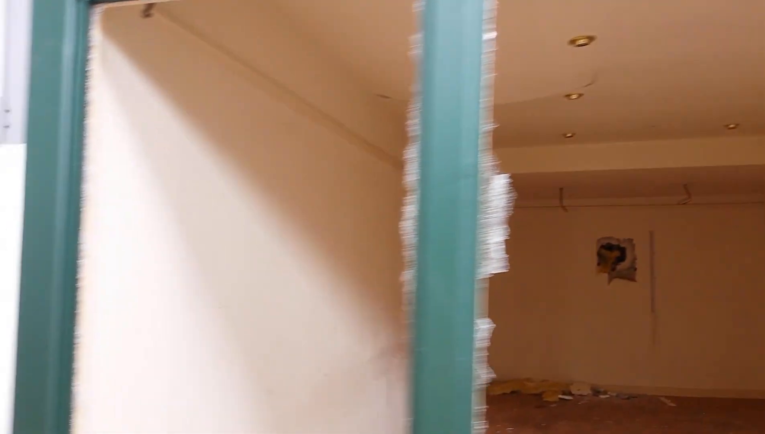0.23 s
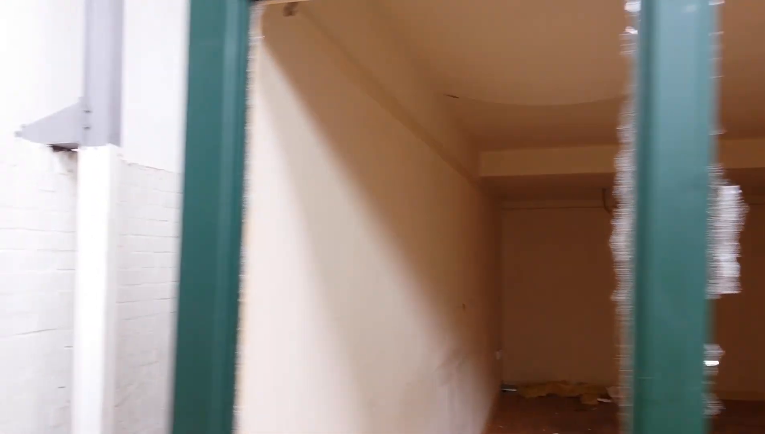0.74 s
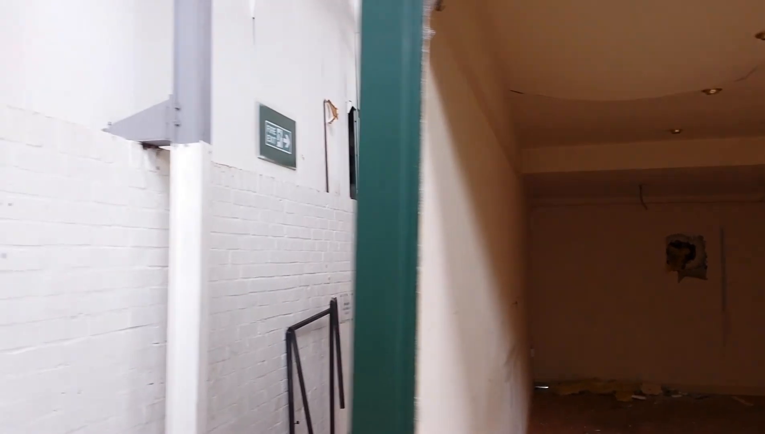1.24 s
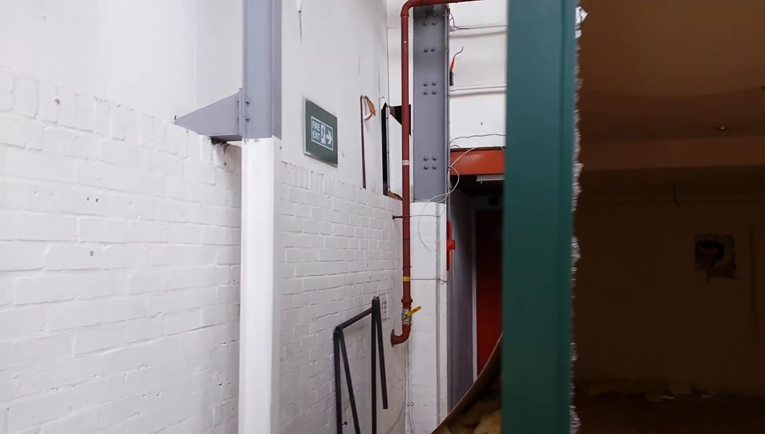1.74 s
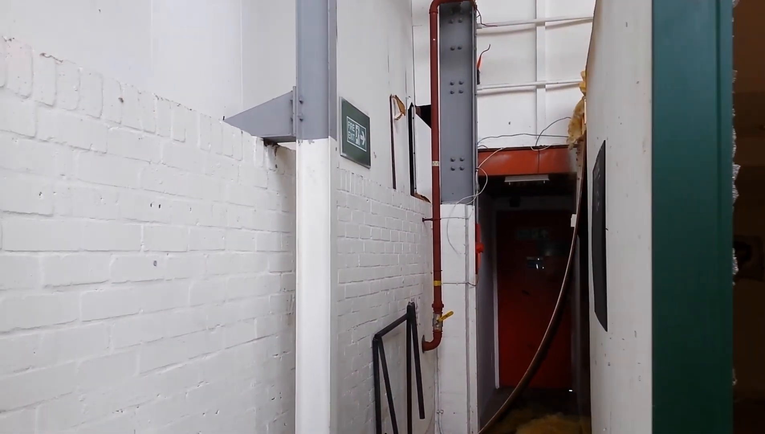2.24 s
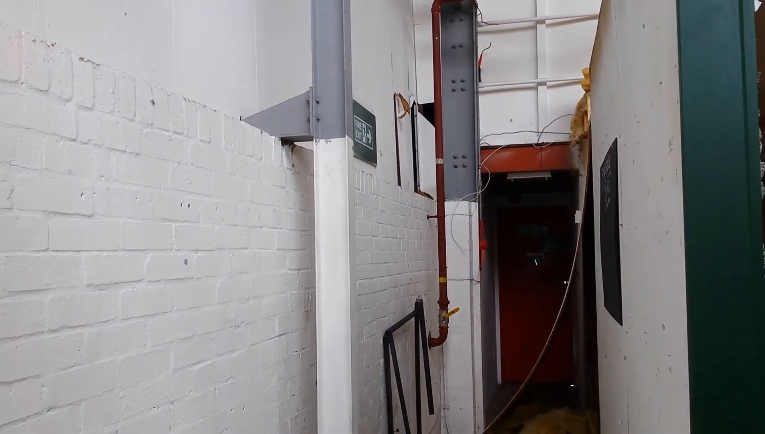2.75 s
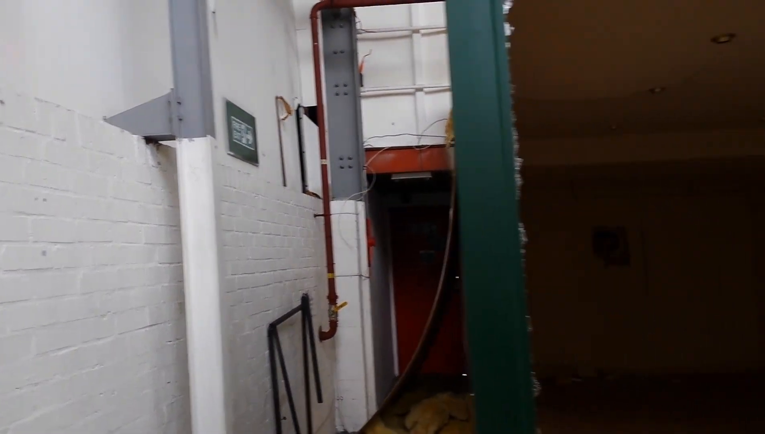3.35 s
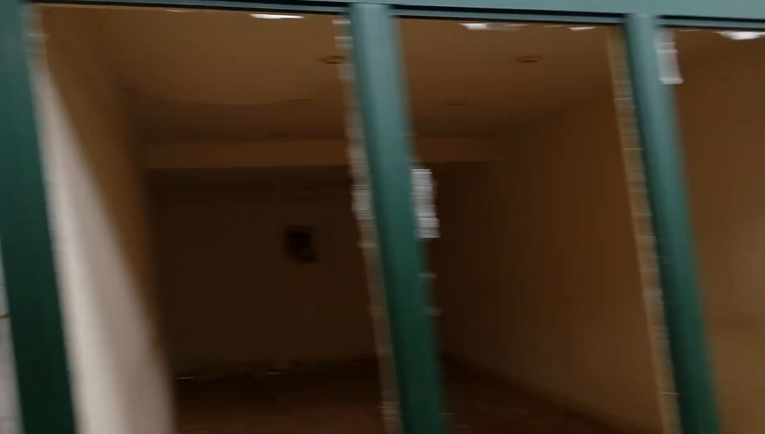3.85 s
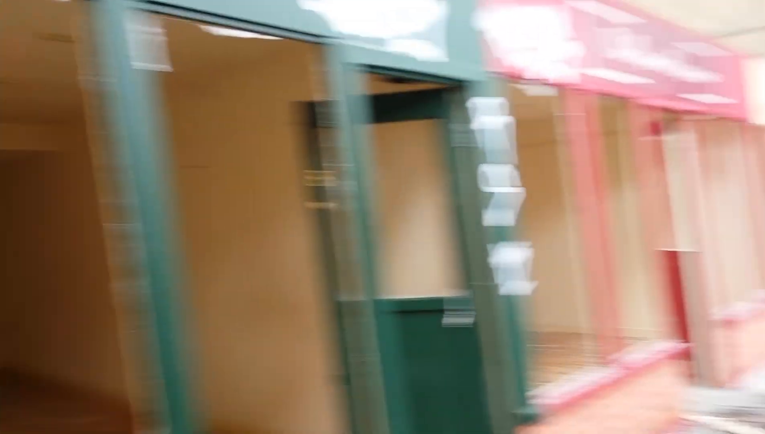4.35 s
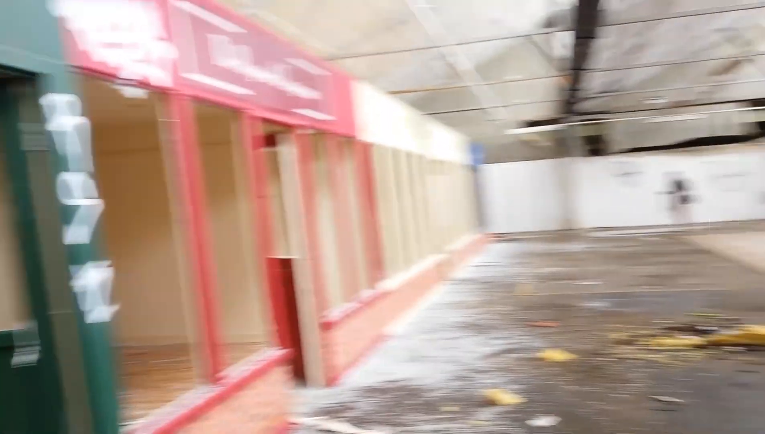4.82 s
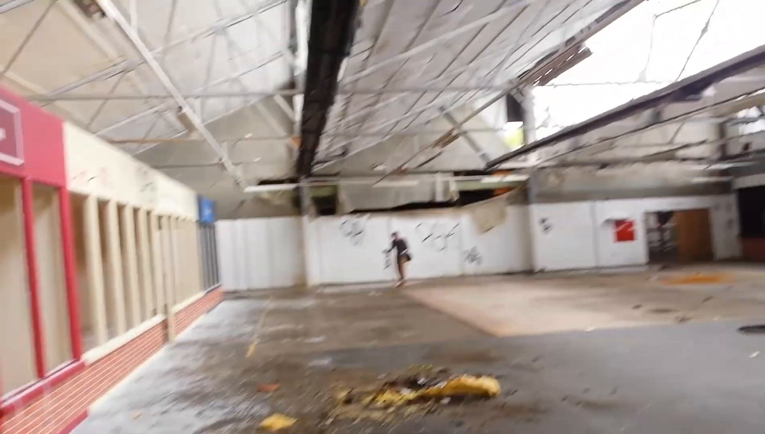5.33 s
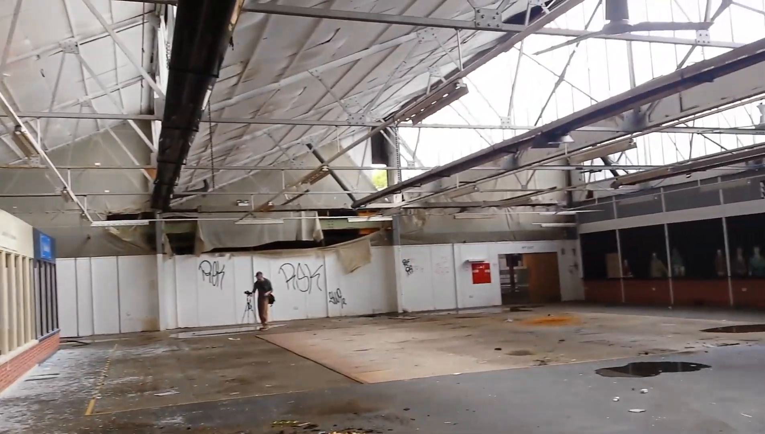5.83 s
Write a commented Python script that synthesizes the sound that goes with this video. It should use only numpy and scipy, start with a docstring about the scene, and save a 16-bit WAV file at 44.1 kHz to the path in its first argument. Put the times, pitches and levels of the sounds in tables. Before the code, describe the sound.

Someone walks slowly across littered concrete, soles grinding and snapping flakes, a loud metallic clank early, bare walls reverberating over faint hiss.

```python
"""Slow footsteps cross the littered concrete floor of an empty hall, heard through hand-held microphones.
Soles thump as sinking tones with a rattle, grind as showers of random grains and snap flakes in short cracks.
One step lands on a loose metal sheet, and small metal pieces clink: both are sums of decaying partials.
Bare walls answer with decaying noise responses, a quick dense echo and a longer tail, over a faint hiss.
The grip adds a soft low rumble as the microphones are swung round and as each footfall jolts the hand."""
import sys
import numpy as np
from scipy import signal
from scipy.fft import rfft, irfft, next_fast_len
from scipy.io import wavfile
from scipy.ndimage import uniform_filter1d

SR = 44100
rng = np.random.default_rng(int(sys.argv[2]) if len(sys.argv) > 2 else 0)


def master(y):
    """Save y as 16-bit WAV."""
    cut = np.clip(np.atleast_2d(y).T, -1, 1)
    pcm = np.round(cut * 32767)  # scale
    wavfile.write(sys.argv[1], SR, pcm.astype(np.int16))


N = 268436
T = np.arange(N) / SR

# each footfall or shift of the foot and the litter under it: [t/s, flake pitch f/Hz,
# sole rumble level re grit/dB, splinter level re crack/dB before makeup gain, left minus right/dB]
FOOTFALLS = [(0.138, 1750, 1, -34, 0), (1.082, 1470, 0.5, -18, -2), (1.87, 1330, -4.5, -9, 0.5),
             (2.109, 1040, -24, -20, 0), (2.671, 1040, 3, -43, 0), (3.403, 1580, -8, -16.5, -2),
             (3.591, 1560, -6, -21.5, -2.5), (4.421, 1700, -1.5, -24.5, -2.5),
             (5.155, 1030, -7, -20.5, -0.5), (5.53, 2670, -20, -30, -2), (5.882, 1220, -1.5, -18.5, -2)]
# spectrum of crackling grit: [f/Hz, relative level/dB]
GRIT_SPECTRUM = [(100, -63), (700, -15), (2000, -7.5), (3300, 1), (4500, -3), (6500, 1), (8000, -9.5),
                 (10000, -12.5), (13000, -12.5), (16000, -10.5)]


def undb(db):
    """Decibels to gain."""
    return 10 ** (np.asarray(db) / 20)


def unit(x):
    """Scale to rms 1."""
    return x / np.sqrt(np.mean(x ** 2))


def impulse(x):
    """Scale a stereo response to a mean energy of 1 a channel."""
    return unit(x) / np.sqrt(x.shape[-1])


def add(out, s, x):
    """Mix x into out from time s on."""
    i = int(max(s, 0) * SR)
    out[:, i:i + x.shape[-1]] += x[..., :max(N - i, 0)]


def colour(x, points):
    """Causal minimum-phase filter, made by folding the cepstrum, that follows (Hz, dB) points."""
    n = 2 * next_fast_len(x.shape[-1])
    hz, db = np.transpose(points)
    bins_hz = np.arange(n // 2 + 1) * SR / n
    curve_db = np.interp(np.log(bins_hz + 1), np.log(hz), db)
    cepstrum = irfft(np.log(undb(curve_db)))
    cepstrum[1:n // 2] *= 2
    cepstrum[n // 2 + 1:] = 0
    return irfft(rfft(x, n) * np.exp(rfft(cepstrum)))[..., :x.shape[-1]]


def resonate(x, hz, q):
    """One resonance, run twice for steep skirts; q has a floor that rises with pitch."""
    b, a = signal.iirpeak(hz, max(q, 4 * hz / SR), fs=SR)
    return signal.lfilter(b, a, signal.lfilter(b, a, x))


def stereo_noise(n, apart_hz=1900):
    """Noise at two close microphones: alike in the bass, unrelated in the treble."""
    mid, side = rng.standard_normal((2, n))
    bins_hz = np.arange(n // 2 + 1) * SR / n
    side = irfft(rfft(side) * np.minimum(bins_hz / apart_hz, 1), n)
    return unit(np.array([mid + side, mid - side]))


def burst(decay_s, size=1536):
    """The brief crackle of one fracture: noise that dies exponentially."""
    return stereo_noise(size) * np.exp(-T[:size] / decay_s)


def background():
    """Still air and microphone hiss: shaped noise, alike in both ears only at the very bottom."""
    # air and hiss spectrum: [f/Hz, relative level/dB]
    air_spectrum = [(15, -36), (25, 6), (43, -0.5), (87, -2), (270, -7), (463, -7.5), (575, -7.5),
                    (1330, -13.5), (2220, -15.5), (6210, -13.5), (14800, -26), (16000, -31)]
    # the air grows louder as the microphones turn from the corner to the open hall: [t/s, gain/dB]
    air_turn = [(3.3, -4), (4.1, -1.5)]
    level_db = -50 + np.interp(T, *np.transpose(air_turn))
    return undb(level_db) * unit(colour(stereo_noise(N, apart_hz=500), air_spectrum))


def handling(jolt_db=-51, jolt_lag_s=0.016, jolt_s=0.044):
    """Soft low rumble through the microphone body as the grip shifts and each footfall jolts the hand."""
    # grip rumble while the microphones are swung round: [t/s, level/dB]
    grip_levels = [(3.0, -67), (3.17, -43.5), (3.29, -65), (3.48, -54), (3.75, -37.5), (3.87, -56),
                   (3.97, -49), (4.12, -82)]
    grip = undb(np.interp(T, *np.transpose(grip_levels), left=-100, right=-100))
    jolts = sum(np.exp(-((T - step[0] - jolt_lag_s) / jolt_s) ** 2) for step in FOOTFALLS)
    # each side has its own noise and a share of a common one
    noise = rng.standard_normal((2, N)) + .5 * rng.standard_normal(N)
    rumble = colour(noise, [(20, -9), (70, 2.0), (130, -6.5), (250, -31.5), (1000, -60)])
    return (grip + undb(jolt_db) * jolts) * unit(rumble)


def hall(x, near_db=-4, far_db=-9, near_t60=0.46, far_t60=1.42, build_s=0.0054, size=70000):
    """Near walls return a dense early echo; the whole hall rings on, weak in the deep bass and the top."""
    t, response = T[:size], 0
    near = [(60, 4.5), (200, -4), (400, 0.5), (800, 1.5), (6000, -0.5), (10000, 1.0), (16000, 2.5)]
    far = [(60, -2.5), (200, 0), (400, 1.5), (800, 4.5), (2500, -2.5), (6500, -2.0), (10000, -7.5), (16000, -3)]
    for db, t60, walls in ((near_db, near_t60, near), (far_db, far_t60, far)):
        decay = (1 - np.exp(-(t / build_s) ** 2)) * np.exp(-np.log(1000) * t / t60)
        response = response + undb(db) * colour(impulse(stereo_noise(size) * decay), walls)
    (left, right), (to_left, to_right) = x, response
    return np.array([signal.fftconvolve(left, to_left)[:N], signal.fftconvolve(right, to_right)[:N]])


def ring(modes, scatter_db, size=14000):
    """Decaying partials (Hz, dB, t60) that buzz against the floor; each blow and each side weights them anew."""
    t, out = T[:size], 0
    for hz, db, t60 in modes:
        # the two sides drift apart in phase towards the treble
        phase = rng.uniform(-np.pi, np.pi, (2, 1)) * min(hz / 5000, 1)
        buzz = .3 * unit(uniform_filter1d(rng.standard_normal(size), 350))  # phase wander in radians
        gain = undb(db + scatter_db * rng.standard_normal((2, 1)))
        build = 1 - np.exp(-t * hz)  # a partial takes about a cycle to build up
        life = build * np.exp(-np.log(1000) * t / t60)
        out = out + gain * life * np.sin(2 * np.pi * hz * t + phase + buzz)
    return out


def metal(ring_db=-14, chatter_db=0, chatter_s=0.0031, detune=0.011):
    """The trodden sheet rings once; the small pieces chatter on contact and are damped quickly."""
    # partials of the loose sheet, damped by the foot on it: [f/Hz, level/dB, t60/s]
    sheet_partials = [(254.3, -19.5, 0.33), (280, -19.5, .3), (374, -22, 0.3), (433, -26, 0.37),
                      (522, -25, 0.38), (1316, -26.5, 0.4), (1423, -33, 0.16), (1535, -36, 0.1),
                      (1653, -33, 0.19), (2625, -41, 0.28), (5390, -31, 0.24), (5535, -33, .22),
                      (6150, -36, 0.27), (7640, -36, 0.19), (7995, -35, 0.16), (8650, -45, .12),
                      (10300, -42, .12), (11890, -31, 0.13), (12150, -39, .1), (13240, -43, .12)]
    # small metal pieces knocking: [t/s, level/dB before ring and chatter gain, piece (0 bright, 1 dull)]
    contacts = [(2.932, -34, 0), (3.028, -32, 0), (4.870, -25, 0), (4.900, -39, 0), (4.947, -26, 0),
                (5.019, -26, 0), (5.229, -36, 1), (5.348, -27, 1), (5.381, -27, 1)]
    # partials of the bright piece: [f/Hz, nominal width/Hz, relative level/dB]
    bright_partials = [(2910, 100, -14), (4560, 46, -2.5), (5300, 70, -1), (7070, 29, 0), (7960, 200, -12),
                       (8500, 21, -32), (10160, 36, -11), (12100, 48, -12), (14000, 56, -22),
                       (14600, 77, -26)]
    # partials of the dull piece: [f/Hz, nominal width/Hz, relative level/dB]
    dull_partials = [(4640, 47, -28), (5200, 36, 4), (6660, 25, -1), (7660, 31, -13), (13600, 180, -43)]
    out = np.zeros((2, N))
    sheet_s, clink_t60 = 1.083, .16
    add(out, sheet_s, ring(sheet_partials, scatter_db=1.8))
    for s, db, piece in contacts:
        partials = dull_partials if piece > .5 else bright_partials
        # each contact loads the piece differently and shifts its partials a little
        modes = [(hz * (1 + detune * rng.standard_normal()), gain_db, clink_t60) for hz, _, gain_db in partials]
        add(out, s, undb(db + ring_db) * ring(modes, scatter_db=-1.5))
        contact = burst(chatter_s)
        contact = contact * T[:contact.shape[1]]  # the chatter swells before it dies
        # contact damping: broad resonances, with level differences between partials halved
        chatter = sum(undb(gain_db / 2) * resonate(contact, hz, hz / (12 * width))
                      for hz, width, gain_db in partials)
        add(out, s, undb(db + chatter_db) * chatter / np.abs(chatter).max())
    return out


def litter(s, reach_s=0.088):
    """The footfall a sound at time s belongs to; the shoe brushes litter for reach_s before it lands."""
    return ([FOOTFALLS[0]] + [step for step in FOOTFALLS if step[0] - reach_s <= s])[-1]


def crumbs(count=3, from_s=.12, to_s=.55, crack_db=-31.5, knock_db=-53.5, spread_db=2.5):
    """Faint snaps (s, crack dB, knock dB) at random delays as the trodden litter settles."""
    rows = []
    for step in FOOTFALLS:
        for _ in range(count):
            delay = from_s + (to_s - from_s) * rng.random()
            size_db = spread_db * rng.standard_normal()
            rows.append((step[0] + delay, crack_db + size_db, knock_db + size_db))
    return rows


def snaps(crack_db=7, knock_db=21, splinter_db=21, creak_db=-15, creak_s=.004):
    """A flake starts to give, then breaks with a crack, a knock at its own pitch and a spray of splinters."""
    # flakes of debris snapping: [t/s, crack level/dB, flake knock level/dB], both before makeup gain
    flake_snaps = [(0.127, -22, -37), (0.2908, -29, -18), (0.3307, -15, -14.5), (0.4884, -11, -27),
                   (0.6905, -26, -31.5), (0.9998, -30, -32), (1.0799, -9, -32), (1.3248, -26.5, -56),
                   (1.8694, -37, -17.5), (1.937, -22, -15.5), (2.1014, -19.5, -20.5), (2.208, -33, -23.5),
                   (2.5444, -21.5, -38.5), (2.6732, -11, -33.5), (3.0289, -21.5, -40), (3.103, -23, -60),
                   (3.4033, -7, -20), (3.5911, -13, -16), (3.7539, -16, -38), (4.077, -25.5, -50),
                   (4.424, -8, -38), (4.4844, -12.5, -36), (4.8691, -20, -62), (5.103, -12.5, -44),
                   (5.227, -29, -31), (5.3011, -17, -44), (5.5216, -26, -34.5), (5.7244, -20, -49),
                   (5.8628, -21.5, -51)]
    # spectrum of the crack: [f/Hz, relative level/dB]
    crack_spectrum = [(100, -27.5), (700, 0.5), (2000, 2.5), (4000, -5.5), (6800, 1.5), (9000, -12),
                      (12000, -27.5), (16000, -16)]
    out = np.zeros((2, N))
    for s, db, body_db in flake_snaps + crumbs():
        _, hz, _, top_db, pan_db = litter(s)
        crack = undb(db + crack_db) * impulse(colour(burst(decay_s=0.0065), crack_spectrum))
        knock = undb(body_db + knock_db) * impulse(resonate(burst(decay_s=0.0076), hz, q=0.54))
        spray = impulse(resonate(burst(decay_s=0.011), 10140, q=1.4))
        splinters = undb(db + top_db + splinter_db) * spray
        sides = undb(np.array([[pan_db], [-pan_db]]) / 2)
        creak = undb(db + creak_db) * colour(burst(decay_s=0.005), GRIT_SPECTRUM) / 2
        add(out, s - creak_s, creak)
        add(out, s, sides * (crack + knock + splinters))
    return out


def grains(force, rate, spread_db, response):
    """Random grains, many small and a few large, that sound as strongly as the force presses."""
    chance = rng.random(len(force))
    heft = np.minimum(rng.exponential(size=len(force)), 3)
    hits = (chance < rate / SR) * undb(spread_db * heft) * rng.choice([-1, 1], len(force))  # rate per second
    pressed = unit(hits + 1e-9) * force  # the offset keeps an empty shower from dividing by zero
    return signal.fftconvolve(pressed[None], impulse(response), axes=1)[:, :len(force)]


def scuffs(grit_rate=210, flake_rate=100, grit_spread_db=5, flake_spread_db=5, scatter=0.33,
           sand_hz=7300, gravel_hz=2800, count=5, rise_s=.02, unload_db_per_s=55):
    """The sole loads and unloads: grit and flakes of several sizes crackle, the sole itself rumbles."""
    # a sole grinding over debris: [peak t/s, fall/s, fine grit level/dB, coarse flake level/dB]
    grinds = [(0.16, 0.091, -28, -38.5), (0.23, 0.07, -29.5, -32.5), (0.303, 0.023, -28.5, -24.5),
              (0.356, 0.03, -24.5, -22.5), (0.5, 0.016, -34.5, -55), (1.022, 0.12, -42.5, -41),
              (1.1, 0.094, -33.5, -48), (1.85, 0.063, -41, -36.5), (1.885, 0.018, -24.5, -26),
              (1.937, 0.03, -22.5, -26), (2.112, 0.084, -34.5, -34), (2.22, 0.01, -28.5, -30.5),
              (2.47, 0.19, -47, -47), (2.683, 0.06, -36, -62), (2.94, 0.023, -43, -50),
              (3.025, 0.062, -43.5, -55), (3.43, 0.096, -40.5, -41.5), (3.622, 0.073, -36.5, -35.5),
              (3.76, 0.21, -49, -50), (4.495, 0.053, -38, -46), (4.81, 0.024, -49.5, -63),
              (5.08, 0.18, -47.5, -55), (5.24, 0.25, -45.5, -51.5), (5.78, 0.023, -42.5, -47),
              (5.96, 0.065, -43, -55)]
    # spectrum of the sole's rumble: [f/Hz, relative level/dB]
    sole_spectrum = [(30, -35), (100, -8.5), (180, -2), (280, 2), (420, 1), (620, -3.5), (1200, -26.5),
                     (4000, -59)]
    out = np.zeros((2, N))
    for s, fall, grit_db, flake_db in grinds:
        landed, hz, weight_db, _, _ = litter(s)
        # the sole rumbles less the further the scuff lies from the landing
        sole_db = grit_db + weight_db - unload_db_per_s * abs(s - landed)
        start = max(s - 2 * rise_s, 0)
        t = T[:int((s - start + 4 * fall) * SR)] + start - s
        force = np.where(t < 0, np.exp(-(t / rise_s) ** 2), np.exp(-np.abs(t) / fall))
        # the smaller a particle, the higher it sounds
        grit_pitches = np.linspace(gravel_hz, sand_hz, count)
        flake_pitches = hz * np.exp(scatter * np.linspace(-1, 1, count))
        for grit_hz, flake_hz in zip(grit_pitches, flake_pitches):
            grit_grain = resonate(colour(burst(decay_s=0.0031), GRIT_SPECTRUM), grit_hz, q=0.39)
            grit = grains(force, grit_rate, grit_spread_db, grit_grain)
            flake_grain = resonate(burst(decay_s=0.0084), flake_hz, q=0.91)
            flakes = grains(force, flake_rate, flake_spread_db, flake_grain)
            add(out, start, (undb(grit_db) * grit + undb(flake_db) * flakes) / np.sqrt(count))
        add(out, start, undb(sole_db) * force * unit(colour(stereo_noise(len(t)), sole_spectrum)))
    return out


def landings(swell_s=0.0036, follow_s=.028, follow_db=-15, follow_pitch=0.88, follow_swell_s=0.0083):
    """Each landing, then the rest of the sole: later, weaker, lower and softer (s, dB, Hz, swell s)."""
    # heel or toe landing: [t/s, level/dB, centre pitch f/Hz]
    heel_toe = [(0.14, -24.5, 263), (0.19, -28, 289), (0.228, -24, 263), (1.0812, -6.5, 339),
                (1.834, -32.5, 321.3), (1.870, -20.5, 320), (1.966, -28, 264), (2.67, -25.5, 134),
                (2.673, -25.5, 425), (3.403, -30, 388), (3.591, -25, 378), (3.750, -28.5, 365),
                (4.415, -32, 279), (5.155, -23, 252), (5.226, -28, 272), (5.346, -23.5, 293),
                (5.884, -30, 188)]
    blows = []
    for s, db, hz in heel_toe:
        blows.append((s, db, hz, swell_s))
        blows.append((s + follow_s, db + follow_db, hz * follow_pitch, follow_swell_s))
    return blows


def thumps(rough=0.54, sag=0.33, rattle_ratio=1.044, size=6000):
    """The shoe lands on loose litter: a few hollow cycles sink in pitch as the foot settles, with a rattle."""
    out, t = np.zeros((2, N)), T[:size]
    for s, db, hz, swell in landings():
        age = t / swell
        # the pitch starts a sag above the centre and sinks to a sag below it
        pitch = hz * (1 + sag * (2 * np.exp(-age / 3.08) - 1))
        tone = np.sin(2 * np.pi * np.cumsum(pitch) / SR)
        rattle = unit(resonate(stereo_noise(size), hz * rattle_ratio, q=1.1))
        blow = age * np.exp(1 - age) * (tone + rough * rattle)
        # a small thing radiates little far below its own pitch
        radiation = signal.butter(2, hz / 2, "high", fs=SR, output="sos")
        add(out, s, undb(db) * signal.sosfilt(radiation, blow))
    return out


def scene():
    """Steps and their echo over the quiet of the building."""
    steps = scuffs() + snaps() + thumps() + metal()
    return steps + hall(steps) + handling() + background()


def record(dry, top_hz=15600):
    """Two unlike microphones, the right one thinner at the very bottom and brighter on top; a steep top cut."""
    left = colour(dry[0], [(20, 2.5), (55, -4.5), (100, 2.2), (1000, -2.3), (4500, 3.0), (8000, 3.5), (12000, -3.5)])
    right = colour(dry[1], [(20, -10), (55, 1.5), (100, 2.25), (1000, -0.2), (4500, 1.5), (8000, 7.0), (12000, 2.0)])
    top_cut = signal.ellip(8, .2, 70, top_hz, fs=SR, output="sos")
    return signal.sosfilt(top_cut, np.array([left, right]))


dry = scene()
out = record(dry)
master(out)
```